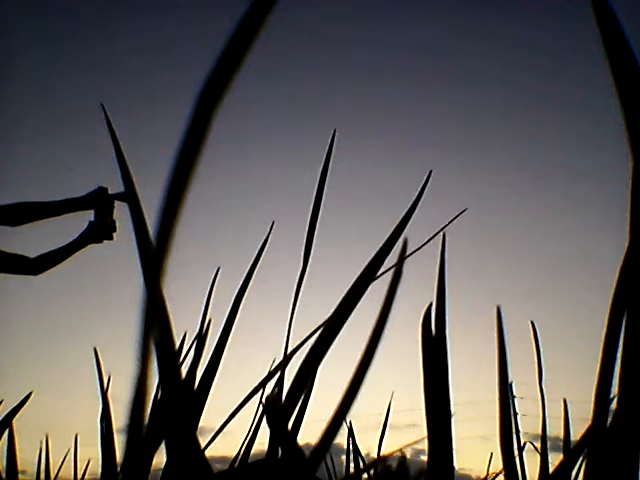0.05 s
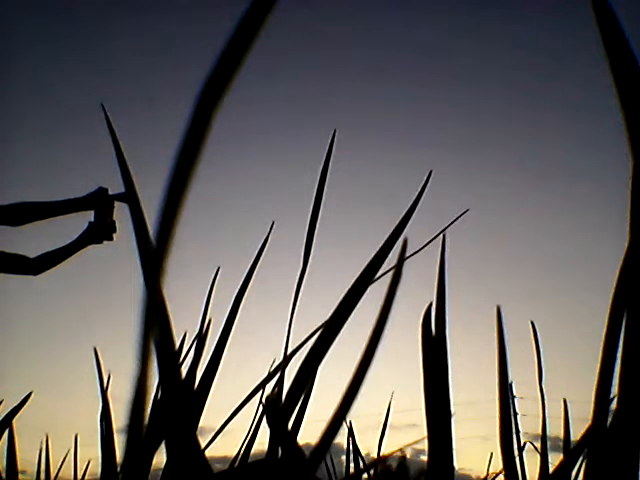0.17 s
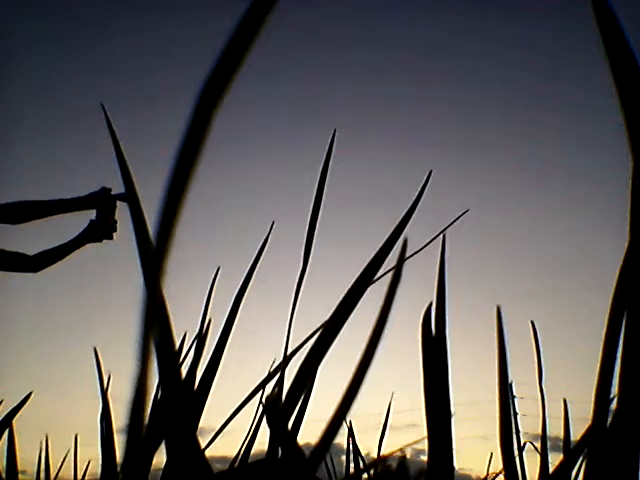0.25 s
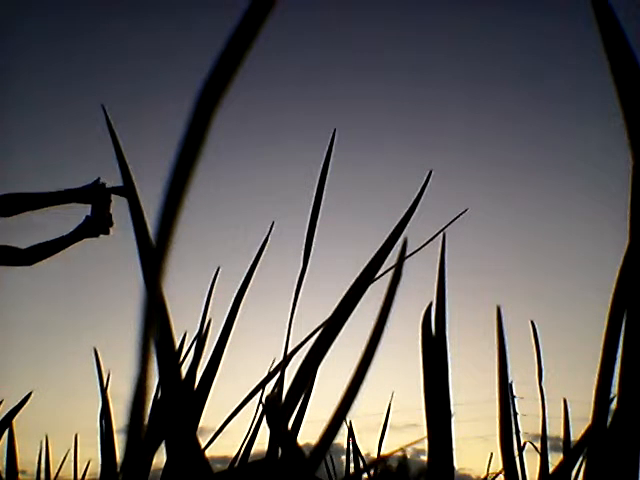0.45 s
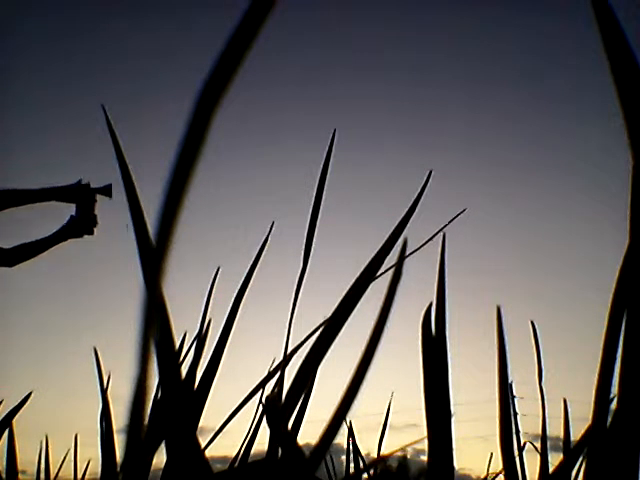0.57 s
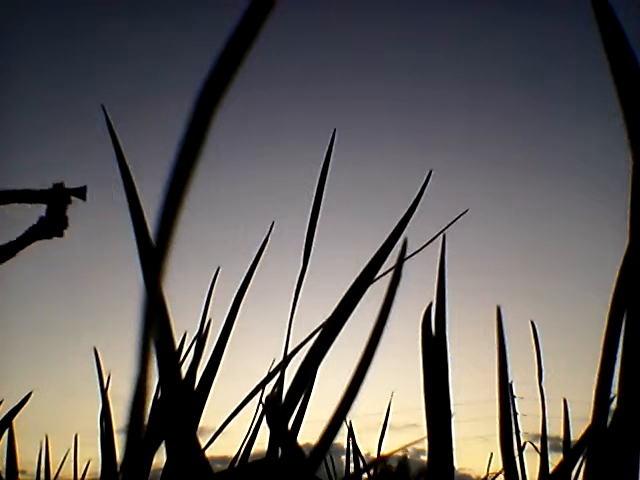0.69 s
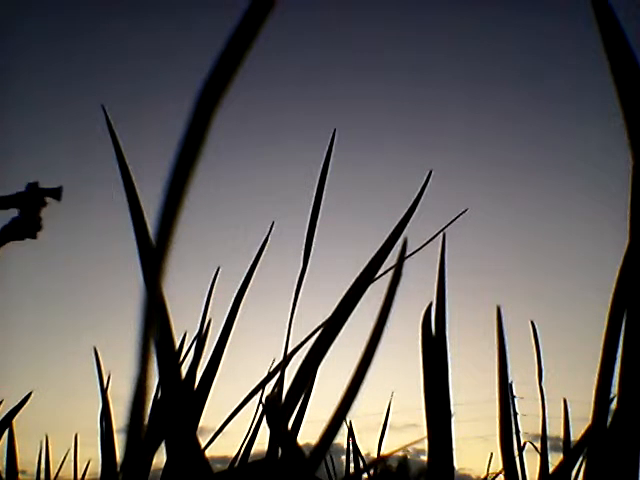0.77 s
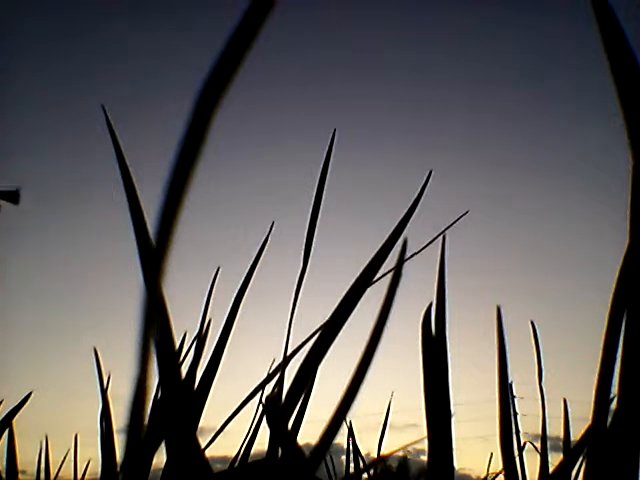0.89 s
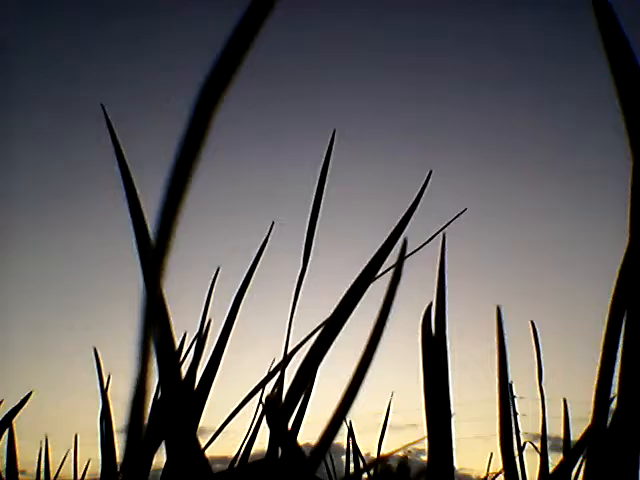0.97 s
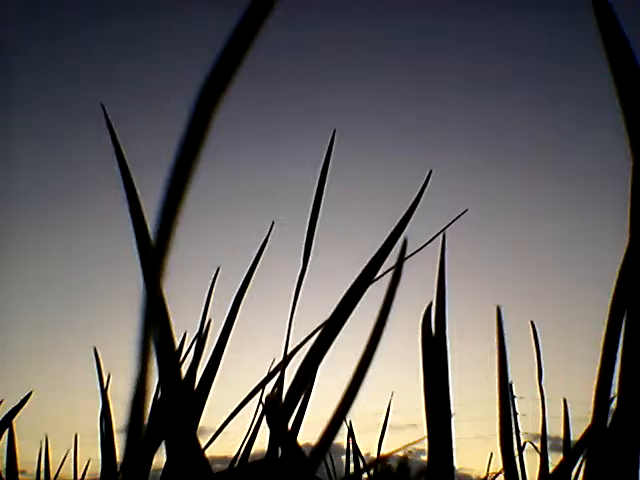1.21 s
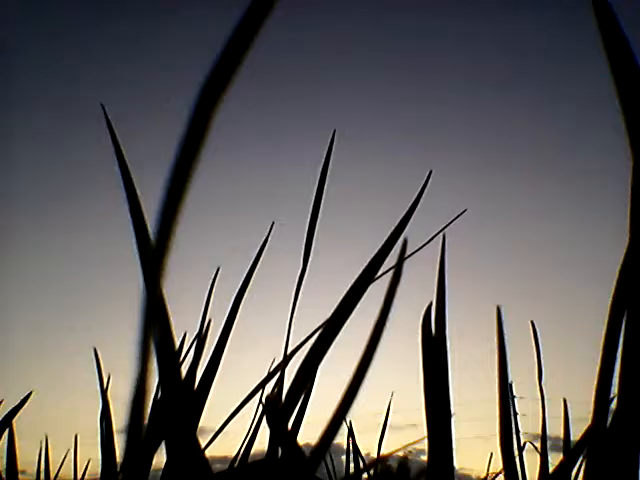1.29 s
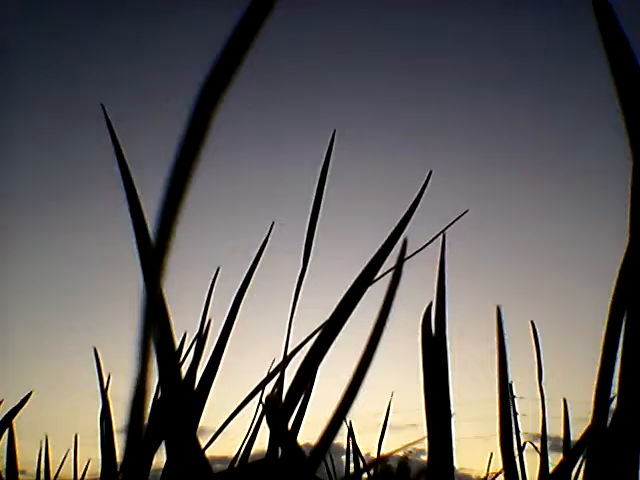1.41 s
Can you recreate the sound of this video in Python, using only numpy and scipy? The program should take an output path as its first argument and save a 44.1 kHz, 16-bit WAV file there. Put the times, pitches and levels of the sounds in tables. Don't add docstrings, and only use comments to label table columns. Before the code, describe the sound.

A hand-held gas horn gives one clipped, very loud short blast with a hiss of gas, close to the microphone outdoors; bright echoes scatter from far walls and fade over faint distant traffic rumble.

```python
import sys
import numpy as np
from scipy import signal
from scipy.fft import rfft, irfft, next_fast_len
from scipy.io import wavfile
from scipy.ndimage import uniform_filter1d, map_coordinates

SR = 44100
rng = np.random.default_rng(int(sys.argv[2]) if len(sys.argv) > 2 else 0)


def pcm_store(signal):
    levels = np.round(np.clip(np.atleast_2d(signal), -1, 1) * 32767)
    wavfile.write(sys.argv[1], SR, levels.astype(np.int16).T)


def makeup_ratio(level_db):
    decades = np.asarray(level_db, float) / 20
    return 10 ** decades


N = 63945


def unit(x):
    return x / np.sqrt(np.mean(x ** 2) + 1e-20)


def along(points, hz):
    f, v = np.transpose(points)
    return np.interp(np.log(hz + 1), np.log(f + 1), v)


def curves(rows):
    s, *cols = np.transpose(rows)
    return [np.interp(np.arange(N) / SR, s, c) for c in cols]


def wobble(rate):
    knots = rng.standard_normal(int(N * rate / SR) + 4)
    return map_coordinates(knots, [np.arange(N) * rate / SR])


def filtered(x, response):
    m = next_fast_len(N + SR // 2)
    return irfft(rfft(x, m) * response(np.fft.rfftfreq(m, 1 / SR)), m)[..., :N]


def causal(x, points):
    cepstrum = irfft(np.log(makeup_ratio(along(points, np.fft.rfftfreq(2048, 1 / SR)))))
    cepstrum[1:1024] *= 2
    cepstrum[1025:] = 0
    return signal.fftconvolve(x, irfft(np.exp(rfft(cepstrum))))[:N]


def sides(db):
    return makeup_ratio([[db / 2], [-db / 2]])


def lagged(x, s):
    return filtered(x, lambda f: np.exp(-1j * np.pi * f * s * np.array([[1], [-1]])))


# frequency in Hz, correlation from 0 to 1.
LIKENESS = [(30, 0.6), (125, 0.98), (400, 1), (1500, 0.28), (5000, 0.12)]


def rush(spectrum, patchy_db):
    z = signal.stft(rng.standard_normal((2, N)), nperseg=512)[2]
    patches = rng.standard_normal(z.shape[1:])
    patches = uniform_filter1d(uniform_filter1d(patches, 3, 0), 8, 1)
    pair = signal.istft(z * makeup_ratio(patchy_db * unit(patches)), nperseg=512)[1][:, :N]

    def mid_side(hz):
        turn = np.arccos(np.clip(along(LIKENESS, hz), -1, 1)) / 2
        return makeup_ratio(along(spectrum, hz)) * [np.cos(turn), np.sin(turn)]

    mid, side = filtered(pair, mid_side)
    return unit(np.array([mid + side, mid - side]))


# frequency in Hz, level in dB.
ROAD_COLOUR = [(15, -58), (25, -27), (95, -0.5), (156, -3), (189, -5.5), (493, -19), (546, -22),
               (730, -28.5), (1500, -43), (1950, -85.5), (3300, -120)]
# time in seconds, gain in dB.
ROAD_SWELL = [
    (0, -7.5),
    (.1, 1),
    (.2, 5),
    (.6, 1),
    (1.1, -1),
    (1.25, 4.5),
    (1.45, -4.5),
]


def traffic():
    level_db, deep_hz, pan_db, lag_s = -34, 300, -2.3, .0003
    road = lagged(rush(ROAD_COLOUR, patchy_db=4), lag_s)
    deep = filtered(road, lambda f: 1 / (1 + (f / deep_hz) ** 4))
    swell = makeup_ratio(curves(ROAD_SWELL)[0] + 0.57 * wobble(25))
    return (road - deep + deep * swell) * makeup_ratio(level_db) * sides(pan_db)


# frequency in Hz, level in dB.
AIR_COLOUR = [(880, -46), (1500, -13.5), (2040, -10), (2380, -10), (5300, -10), (6550, -3), (7210, -9),
              (13100, -9.5), (15000, -20)]


def air():
    return makeup_ratio(-59.5) * rush(AIR_COLOUR, patchy_db=4)


# time in seconds, flow level in dB.
GAS_FLOW = [
    (.2, -70),
    (.215, -50),
    (.228, -33),
    (.243, -26),
    (.254, -13),
    (.275, -15),
    (.3, -26),
    (.33, -30),
    (.345, -50),
]
# frequency in Hz, level in dB.
GAS_COLOUR = [(500, -42.5), (2000, -12.5), (4000, -12.5), (6300, 0), (9000, -6), (14500, -13.5)]


def gas_jet(phase):
    t = np.arange(N) / SR
    flow = makeup_ratio(-6 + curves(GAS_FLOW)[0]) * (t > GAS_FLOW[0][0]) * (t < GAS_FLOW[-1][0])
    hiss = unit(filtered(rng.standard_normal(N), lambda f: makeup_ratio(along(GAS_COLOUR, f))))
    return hiss * flow * (1 + 0.47 * np.cos(phase))


# time in seconds, level in dB, overtone loss in dB per order.
SWING = [
    (.229, -47.5, 20.5),
    (.237, -15, 17),
    (.244, 3, 6.5),
    (.25, 4.5, -1),
    (.265, 4, -0.5),
    (.29, 7, 0.04),
    (.328, 6.5, 0.7),
    (.335, 2, 5),
    (.362, -11, 18.5),
]


def diaphragm(phase, hz):
    pulse_db_per_oct, ring_db_per_s = 4.5, 1523.5
    level_db, loss_db = curves(SWING)
    t = np.arange(N) / SR
    ring_db = ring_db_per_s * np.clip(t - SWING[-1][0], 0, 1)
    level = makeup_ratio(level_db - ring_db) * (t > SWING[0][0])
    k = np.arange(1, 23)[:, None]
    order_db = -pulse_db_per_oct * np.log2(k) - np.clip(loss_db, -4, 40) * (k - 1) ** .7
    orders = makeup_ratio(order_db) * (k * hz < SR / 2)
    return level * np.sqrt(2) * (orders * np.cos(k * phase)).sum(0)


# time in seconds, frequency in Hz.
GLIDE = [
    (.229, 1060),
    (.24, 950),
    (.25, 812),
    (.255, 762),
    (.268, 721),
    (.285, 692),
    (.305, 681),
    (.327, 680),
    (.342, 700),
]
# frequency in Hz, gain in dB.
LEFT_COLOUR = [(700, 1), (1400, -2), (2700, -0.5), (4700, -4), (6700, -4), (8400, 0.5), (11000, 1.5),
               (14500, -8)]
RIGHT_COLOUR = [(700, -0.5), (1400, -3), (2100, -8), (3500, -4), (5000, 0.5), (6800, 2), (8900, -5),
                (14500, 4)]


def horn():
    jitter, left_leads_s = .001, .00011
    port_hz, port_width_hz, port_db = 6220, 1100, 7.5
    hz, = curves(GLIDE)
    phase = 2 * np.pi * np.cumsum(hz * (1 + jitter * wobble(300))) / SR
    sound = diaphragm(phase, hz) + gas_jet(phase)

    def port_ring(f):
        damping = 1j * f * port_width_hz
        return 1 + makeup_ratio(port_db) * damping / (port_hz ** 2 - f * f + damping)

    left = causal(sound, LEFT_COLOUR)
    right = filtered(causal(sound, RIGHT_COLOUR), port_ring)
    return lagged(np.array([left, right]), -left_leads_s)


def smear(s, spread):
    t = np.arange(N) / SR
    patch = rng.standard_normal((2, N)) * np.exp(-np.abs(t - s) / spread)
    return patch / np.linalg.norm(patch[0])


# frequency in Hz, time to fall 60 dB in seconds.
TAIL_DECAY = [(700, 1), (1400, 1.), (3000, 1.8), (6000, 0.96), (12000, 0.55)]
# frequency in Hz, gain over the direct sound in dB.
NEAR_COLOUR = [(300, -45), (700, -0.5), (1400, 0.5), (2700, -1), (4000, 5.5), (6300, -1), (9000, 7.5),
               (13000, -18)]
# delay in seconds, level in dB, spread in seconds.
LOW_BANK = (0.15, -40, .01)


def surroundings():
    tail_db, near_db, near_t60 = -24, -9.5, 0.17
    hz, t, z = signal.stft(rng.standard_normal((2, N)), SR, nperseg=256)
    decay = makeup_ratio(-60 * t / along(TAIL_DECAY, hz)[:, None])
    tail = signal.istft(z * decay, SR, nperseg=256)[1][:, :N]
    near = rng.standard_normal((2, N)) * makeup_ratio(-60 * np.arange(N) / SR / near_t60)
    diffuse = makeup_ratio(tail_db) * tail / np.linalg.norm(tail[0])
    diffuse = diffuse + makeup_ratio(near_db) * near / np.linalg.norm(near[0])
    s, db, spread = LOW_BANK
    diffuse = diffuse + makeup_ratio(db) * smear(s, spread)
    return filtered(diffuse, lambda f: makeup_ratio(along(NEAR_COLOUR, f)))


# delay in seconds, level in dB, spread in seconds, left over right in dB.
WALLS = [(.22, -42.5, 0.035, 9), (.31, -30.5, 0.028, 5.5), (0.333, -29.5, 0.016, 3), (.38, -28.5, .005, 6),
         (.445, -34, 0.027, 4), (0.501, -35, 0.0076, 4.5), (0.573, -38, 0.019, 8),
         (0.641, -48.5, 0.029, 4.5), (0.751, -49.5, 0.049, 5), (.81, -51.5, 0.037, 1),
         (.95, -55, 0.12, 5.5)]
# frequency in Hz, gain in dB.
WALL_COLOUR = [(300, -79.5), (700, -35), (1400, -22.5), (3400, -8), (6300, 3), (9000, 0), (11000, -18),
               (14000, -52)]


def far_walls():
    walls = np.zeros((2, N))
    for s, db, spread, pan_db in WALLS:
        walls += makeup_ratio(db) * sides(pan_db) * smear(s, spread)
    return filtered(walls, lambda f: makeup_ratio(along(WALL_COLOUR, f)))


def field(x):
    paths = surroundings() + far_walls()
    return signal.fftconvolve(x, paths, axes=1)[:, :N]


# time in seconds, level in dB, time to fall 60 dB in seconds.
STALK = (1.436, -15, .004)


def grass_tick():
    s, db, t60 = STALK
    t = np.arange(N) / SR - s
    steepness = np.where(t < 0, 4, 1)
    tick = rng.standard_normal(N) * makeup_ratio(db - 60 * np.abs(t) / t60 * steepness)
    return filtered(tick, lambda f: (f / (f + 3000)) ** 3 / (1 + (f / 9000) ** 4)) * sides(10)


def scene():
    blast = horn()
    return blast + field(blast) + (traffic() + grass_tick() + air())


def top_cut(x):
    return signal.sosfilt(signal.butter(12, 15450, fs=SR, output="sos"), x)


def record(dry):
    duck_s, duck_tau_s, duck_db = .242, .011, 18.5
    hold_s, recover_db_per_s = 1.039, 52.5
    ceiling, knee = .93, 14
    top_hz, edge_hz = 14700, 90
    t = np.clip(np.arange(N) / SR - duck_s, 0, None)
    gain_db = -duck_db * (1 - np.exp(-t / duck_tau_s))
    gain_db = gain_db + recover_db_per_s * np.clip(t - hold_s, 0, None)
    x = dry * makeup_ratio(np.minimum(gain_db, 0))
    x = x / (1 + np.abs(x / ceiling) ** knee) ** (1 / knee)
    x = filtered(x, lambda hz: 1 / (1 + np.exp(np.clip((hz - top_hz) / edge_hz, -30, 30))))
    return top_cut(x)


dry = scene()
out = record(dry)
pcm_store(out)
```